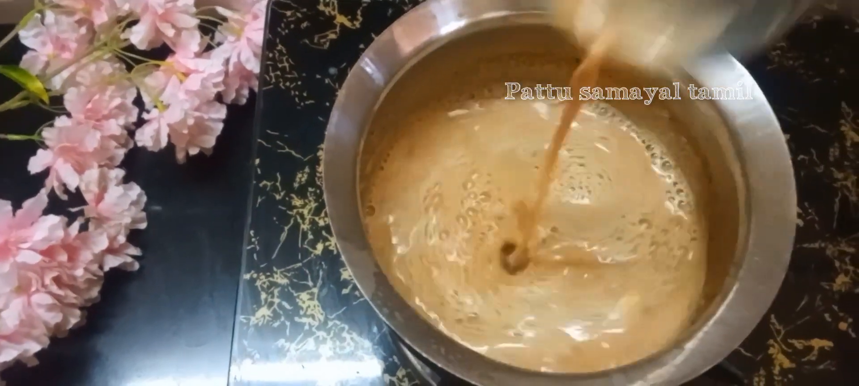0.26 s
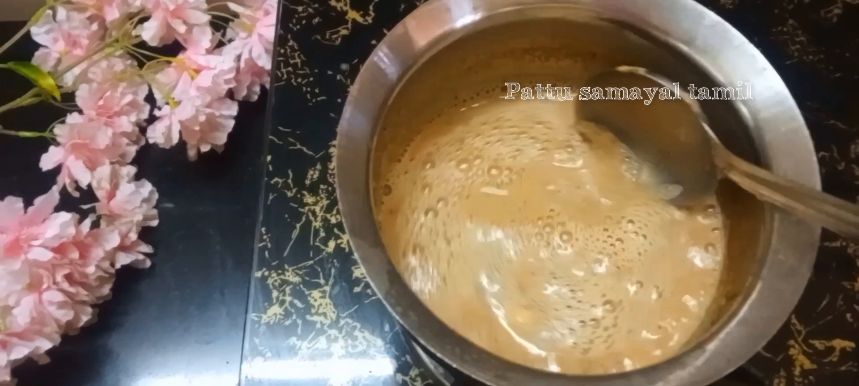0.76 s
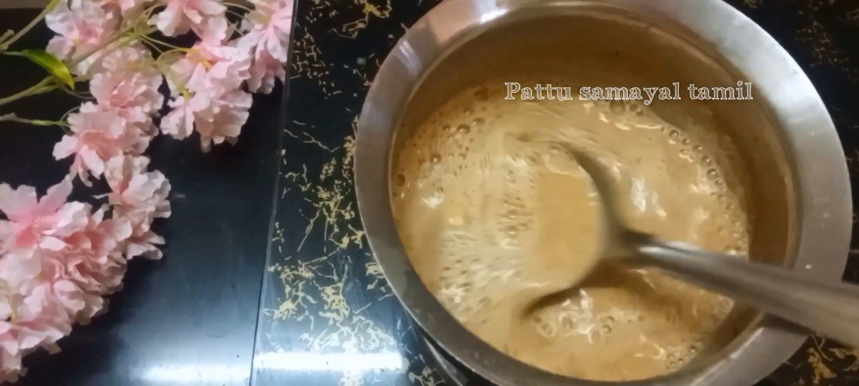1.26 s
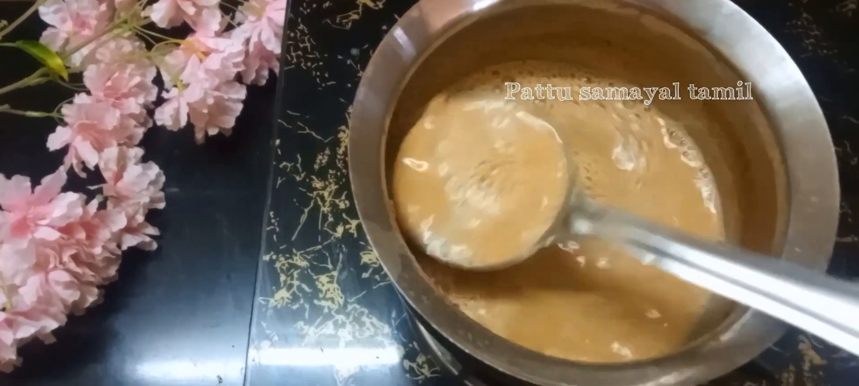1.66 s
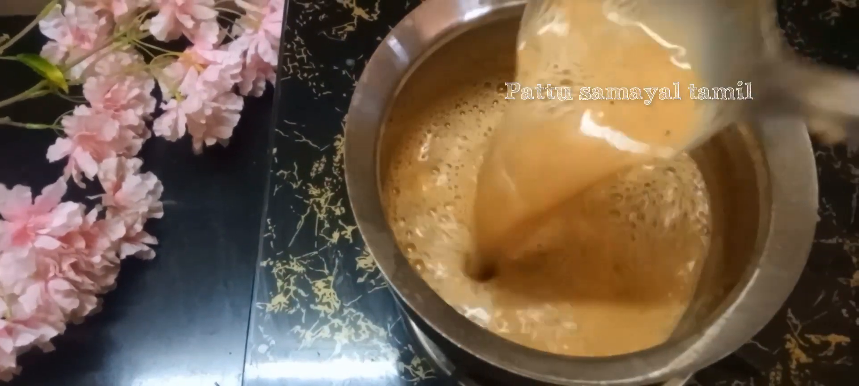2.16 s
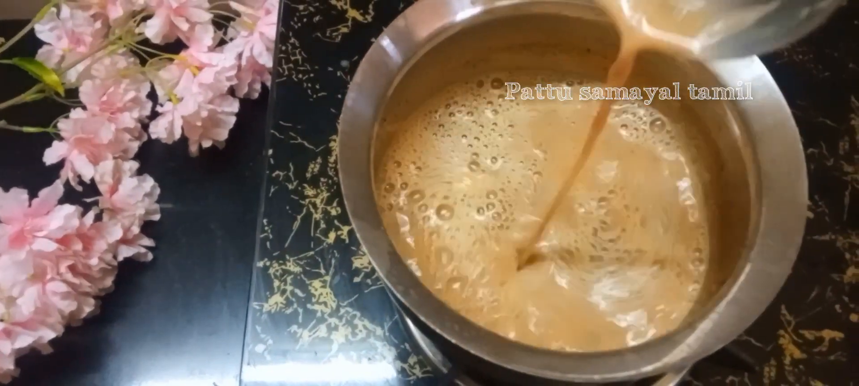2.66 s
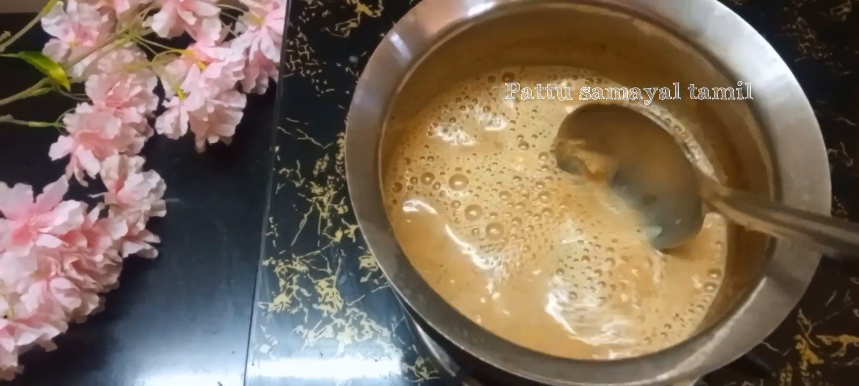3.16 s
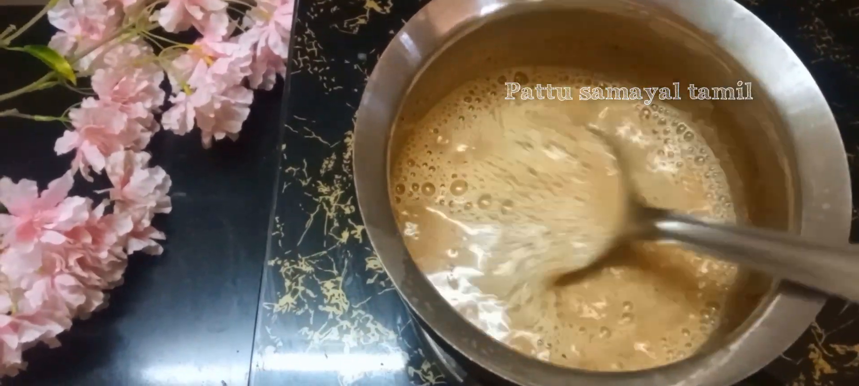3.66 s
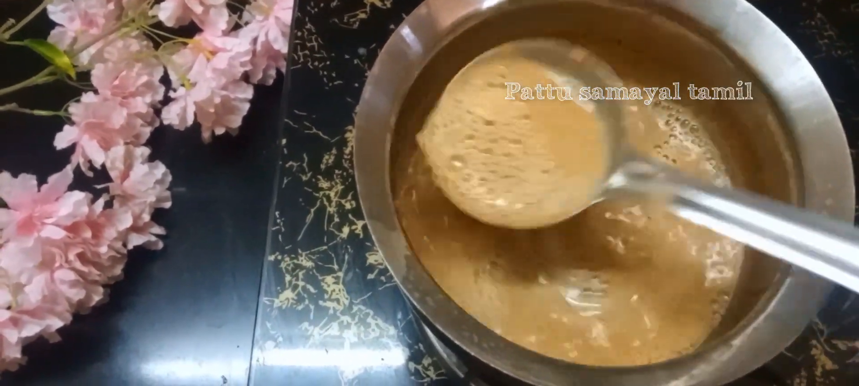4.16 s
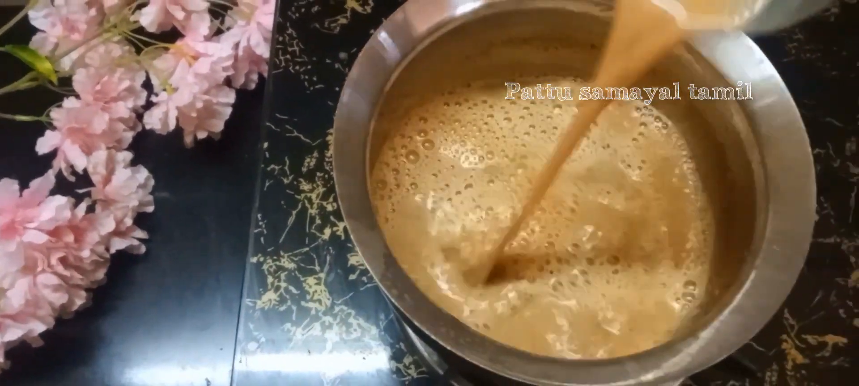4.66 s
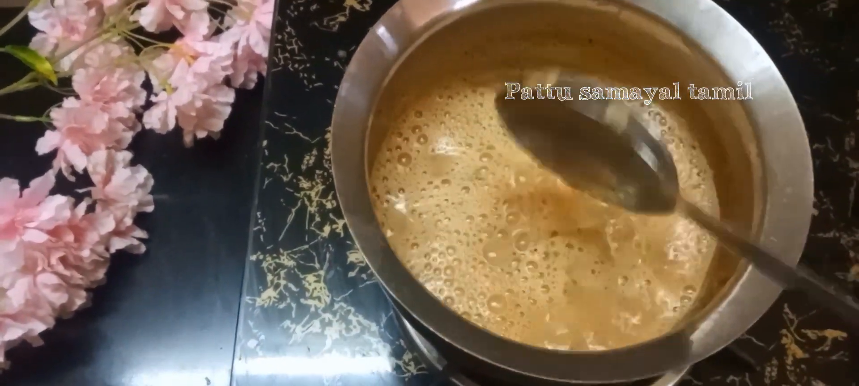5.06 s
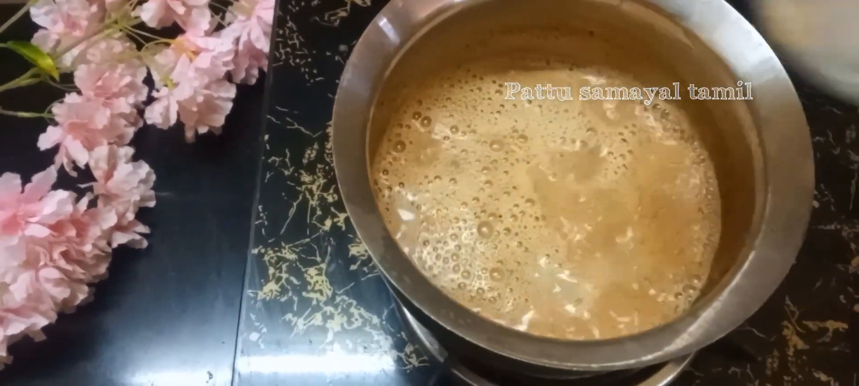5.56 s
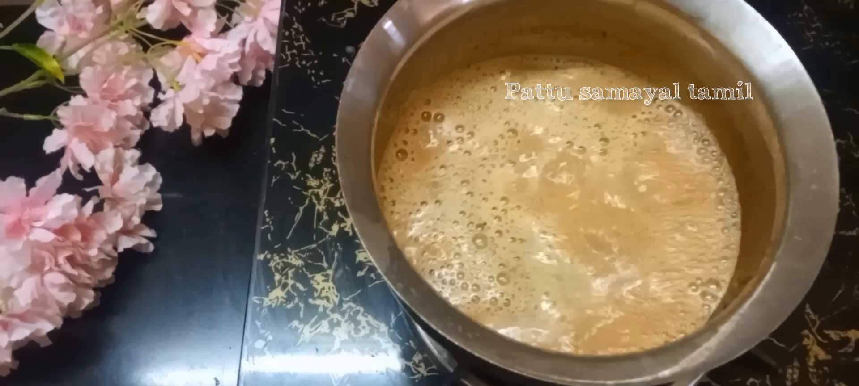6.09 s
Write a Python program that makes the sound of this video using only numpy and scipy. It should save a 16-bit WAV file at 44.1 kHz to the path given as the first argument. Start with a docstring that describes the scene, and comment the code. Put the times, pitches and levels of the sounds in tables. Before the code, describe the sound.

Tea splatters into a metal pot, a ladle clanks brightly and drags along the wall, then more pours, soft knocks and fizzing froth follow.

```python
"""A steel ladle scoops milky tea from a metal pot and pours it back, in a small kitchen, close to a camera.
Its clinks are noise bursts and steel modes, its scrapes are random slips; each blow makes the pot boom on its stand.
The stream splatters as noisy drops and many short rising bubble notes, and leaves a foam of hissing ticks.
Something hard knocks dully nearby: well damped modes under a crunching contact. Air and a hum lie behind.
The camera's two microphone ports resonate at different pitches; the room adds a short diffuse tail."""
import sys
import numpy as np
from scipy import signal
from scipy.fft import rfft, irfft, next_fast_len
from scipy.io import wavfile
from scipy.ndimage import uniform_filter1d, map_coordinates

SR = 44100
rng = np.random.default_rng(int(sys.argv[2]) if len(sys.argv) > 2 else 0)


def store_pcm(level_fs):
    """Save levels as 16-bit WAV."""
    pcm = np.round(np.clip(level_fs, -1, 1) * 32767).astype(np.int16)
    wavfile.write(sys.argv[1], SR, np.atleast_2d(pcm).T)


N = 279153
TIME = np.arange(N) / SR  # s


def amp(db):
    """Decibels to gain."""
    return 10 ** (np.asarray(db) / 20)


def unit(x):
    """Scale to rms 1."""
    return x / np.sqrt(np.mean(x ** 2) + 1e-20)


def peaked(x):
    """Scale to peak 1."""
    return x / (np.abs(x).max() + 1e-20)


def along(points, hz):
    """Read (frequency [Hz], value) points on a log frequency axis."""
    f, v = np.transpose(points)
    return np.interp(np.log(hz + 1), np.log(f + 1), v)


def gains(rows):
    """One smoothed gain curve for each dB column after the time, silent outside the rows."""
    times, *columns = np.transpose(rows)
    curves = [np.interp(TIME, times, db, left=-120, right=-120) for db in columns]
    return [uniform_filter1d(amp(curve), size=256) for curve in curves]


def add(track, start_s, sound):
    """Mix a sound into the track from a start time."""
    part = track[..., max(round(start_s * SR), 0):][..., :sound.shape[-1]]
    part += sound[..., :part.shape[-1]]


def filtered(x, response):
    """Multiply the spectrum of x by a response of frequency."""
    m = next_fast_len(N + SR // 2)
    return irfft(rfft(x, m) * response(np.fft.rfftfreq(m, 1 / SR)), m)[..., :N]


def convolved(x, answer):
    """Play x through an impulse response, at its own length."""
    m = next_fast_len(x.shape[-1] + answer.shape[-1])
    return irfft(rfft(x, m) * rfft(answer, m), m)[..., :x.shape[-1]]


def coloured(x, spectrum, size=2048):
    """Minimum-phase filter with the given (frequency [Hz], level [dB]) shape."""
    cepstrum = irfft(np.log(amp(along(spectrum, np.fft.rfftfreq(size, 1 / SR)))))
    # folding the cepstrum makes the filter causal
    cepstrum[1:size // 2] *= 2
    cepstrum[size // 2 + 1:] = 0
    return convolved(x, irfft(np.exp(rfft(cepstrum))))


def fade(t, t60):
    """Exponential decay by 60 dB in t60 seconds."""
    return np.exp(-np.log(1000) * t / t60)


def burst(t60, spectrum, channels=1):
    """A dying puff of coloured noise, peak 1."""
    t = TIME[:SR // 8]
    noise = rng.standard_normal((channels, len(t)))
    return peaked(coloured(noise * fade(t, t60), spectrum))


def ring(modes, weight, scatter_db):
    """Sum of decaying modes, with strengths and signs drawn anew at each call."""
    t = TIME[:SR]
    out = np.zeros(len(t))
    for hz, db, t60 in modes:
        strength = weight(hz) * amp(db + scatter_db * rng.normal()) * rng.choice([-1, 1])
        out += strength * fade(t, t60) * np.sin(2 * np.pi * hz * t)
    return out


def favour(centre_hz, slope_db):
    """Mode weights that fall with the squared distance in octaves from a centre."""
    return lambda hz: amp(-slope_db * np.log2(hz / centre_hz) ** 2)


def ticks(rate, spread_db):
    """Random impulses of uneven size, on average rate a second."""
    sizes = amp(spread_db * np.minimum(rng.exponential(size=N), 3))
    return (rng.random(N) < rate / SR) * rng.choice([-1, 1], N) * sizes


def wobble(rate):
    """A smooth random curve with rate knots a second."""
    return map_coordinates(rng.standard_normal(int(N * rate / SR) + 4), [TIME * rate])


def patchy(x, depth_db):
    """Let narrow bands come and go at random, then scale to rms 1."""
    z = signal.stft(x, nperseg=512)[2]
    field = rng.standard_normal(z.shape[1:])
    field = uniform_filter1d(uniform_filter1d(field, size=4, axis=0), size=8, axis=1)
    return unit(signal.istft(z * amp(depth_db * unit(field)), nperseg=512)[1][:, :N])


# colour of the background air: (frequency [Hz], level [dB])
AIR_COLOUR = [(25, -30), (60, -4.5), (100, -0.5), (150, -8), (400, -12), (900, -13), (1400, -24),
              (2500, -27.5), (6000, -27), (14000, -40)]
# a low hum swells and sinks: (time [s], level [dB])
HUM_LEVELS = [(0, -70), (1.4, -77), (1.6, -52), (1.8, -79), (2.1, -72.5), (5.6, -79), (6.15, -60),
              (6.33, -75)]


def air():
    """Low kitchen background, part shared and part separate at the two ports, with a wavering hum."""
    shared, left, right = [unit(coloured(rng.standard_normal(N), AIR_COLOUR)) for _ in range(3)]
    tone = np.sin(2 * np.pi * 100 * TIME + 0.23 * wobble(rate=12))
    hum = unit(tone * amp(3.0 * wobble(rate=20)))
    return amp(-67.5) * shared + amp(-68.5) * np.array([left, right]) + gains(HUM_LEVELS)[0] * hum


# how long the small room rings: (frequency [Hz], t60 [s])
ROOM_DECAY = [(150, 0.24), (600, 0.19), (2000, 0.22), (6000, .15), (15000, 0.047)]
# colour of the room tail: (frequency [Hz], level [dB])
ROOM_COLOUR = [(100, -24), (350, 5), (600, 1.5), (1000, -2), (3000, 0), (8000, -9), (15000, 9.5)]


def kitchen(x):
    """A short diffuse tail of decaying noise, different at each port."""
    hz, t, z = signal.stft(rng.standard_normal((2, SR // 2)), SR, nperseg=256)
    tail = signal.istft(z * fade(t, along(ROOM_DECAY, hz)[:, None]), SR, nperseg=256)[1]
    tail = tail * (1 - fade(TIME[:tail.shape[1]], 0.017))  # builds up from nothing
    echo = convolved(x, tail / np.linalg.norm(tail[0]))
    return filtered(echo, lambda f: amp(along(ROOM_COLOUR, f)))


# the froth: (time [s], hiss level [dB])
FOAM_LEVELS = [(0, -59.5), (.6, -55), (.8, -61.5), (1.5, -54.5), (1.85, -55.5), (2.02, -62), (2.3, -59.5),
               (3.1, -57), (3.27, -60.5), (3.6, -55.5), (6.33, -54.5)]
# colour of its hiss: (frequency [Hz], level [dB])
FOAM_COLOUR = [(2000, -21), (3000, -23), (4000, -18), (5000, -12), (5350, -2.5), (6000, -1.5), (6900, 0.5),
               (7500, -9.5), (8000, -26), (9800, -13), (11500, -30), (13800, -37), (15300, -15.5)]


def foam():
    """Countless tiny cells burst in the froth, each a tick that together make a hiss."""
    cells = ticks(rate=8300, spread_db=5) * rng.standard_normal((2, N))
    return gains(FOAM_LEVELS)[0] * unit(coloured(cells, FOAM_COLOUR)) * amp([[.3], [-4]])  # left, right dB


# dull knocks nearby: (time [s], blow level [dB], body level relative to it [dB])
KNOCK_BLOWS = [(3.046, -22, -9), (3.465, -23.5, -5.5), (3.7979, -29, -4), (3.8115, -33, 5),
               (4.2573, -36.5, -8), (4.2766, -28.5, -2), (4.317, -31.5, 2), (4.722, -24.5, -9),
               (5.3466, -34.5, -17), (5.3943, -38, 4), (5.7487, -27, -11.5), (6.2204, -30, -16)]
# modes of the hard thing, before tuning and extra damping: (frequency [Hz], level [dB], t60 [s])
BOARD_MODES = [(610, 1, 0.05), (797, -2, 0.023), (1294, -4, 0.036), (1875, -5, 0.016), (2366, -6.5, 0.023),
               (2680, -2, 0.012), (3120, -14, 0.028), (3500, -25, 0.052), (4220, -13, 0.041)]
BOARD_TUNE, BOARD_LONGEST_S = 0.99, .035  # pitch ratio of the modes; cap on their t60
CRUNCH_T60_S, RATTLE_T60_S = .007, 0.038
GRAZE_S, GRAZE_DB = 0.0035, -16  # how far the graze leads the table time; its level relative to the blow


def knocks():
    """Short dull blows on something hard and well damped; each grazes, crunches and leaves a faint rattle."""
    out, t = np.zeros(N), TIME[:SR // 8]
    for s, db, body_db in KNOCK_BLOWS:
        damped = [(hz * BOARD_TUNE, level, min(t60, BOARD_LONGEST_S)) for hz, level, t60 in BOARD_MODES]
        modes = ring(damped, lambda hz: amp(body_db + 3.0) if hz < 1000 else 1, scatter_db=0.5)
        roughness = 0.64 * fade(t, CRUNCH_T60_S) + amp(-38.5) * fade(t, RATTLE_T60_S)
        contact = rng.standard_normal(len(t)) * roughness
        contact[0] = 1
        thud_colour = [(200, -45), (550, body_db + 18.5), (1000, 5), (2500, -3.5), (4200, 1.5), (6000, -24.5)]
        thud = burst(0.062, thud_colour)[0]
        blow = amp(db) * (peaked(convolved(contact, modes)) + amp(-9.5) * thud)
        add(out, s + .0005, blow)
        add(out, s - GRAZE_S, amp(db + GRAZE_DB) * thud)
    return coloured(out, [(100, -18), (450, 0)])


# single large bubbles: (time [s], peak level [dB], starting pitch [Hz])
GLUG_NOTES = [(.338, -43, 399), (.39, -40, 374), (.78, -57.5, 706), (1.028, -31.5, 377.3),
              (1.715, -58.5, 906), (2.475, -54, 789), (2.82, -49.5, 732), (4.9, -54.5, 767),
              (5.871, -56, 240)]
GLUG_T60_S, GLUG_ATTACK_S, GLUG_RISE = 0.12, 0.029, 0.013  # decay; swell; phase stretch over one t60


def glugs():
    """A large pocket of air swells into a short note that rises slightly."""
    out, t = np.zeros(N), TIME[:SR // 4]
    for s, db, hz in GLUG_NOTES:
        note = np.sin(2 * np.pi * hz * t * (1 + GLUG_RISE * t / GLUG_T60_S))
        swell = (1 - fade(t, GLUG_ATTACK_S)) * fade(t, GLUG_T60_S)
        add(out, s, amp(db) * peaked(swell * note))
    return out


# colour of splashing drops and fine spray: (frequency [Hz], level [dB])
SPRAY_COLOUR = [(880, -66), (1500, -24), (1640, -23.5), (1900, -11.5), (2160, -20.5), (3030, -14.5),
                (3310, -9.5), (6430, 6), (8080, -9.5), (8920, -8.5), (10100, -12), (12500, -24.5),
                (13900, -20), (14900, -18), (16000, -7)]
SLAP_T60_S = 0.018


def slap(sizzle_db, scatter_db=4):
    """A drop slaps the surface: a noise burst with a colour of its own, its sizzle set at 8-14 kHz."""
    colour = []
    for hz, level in SPRAY_COLOUR:
        lift_db = (sizzle_db + 16.5) * (8000 < hz < 14000)
        colour.append((hz, level + scatter_db * rng.normal() + lift_db))
    return burst(SLAP_T60_S, colour, channels=2)


# droplets tried a second; span of their levels; peak of the largest relative to the spray curve
DROPLETS_PER_S, DROPLET_SPREAD_DB, DROPLETS_DB = 40, 14.5, 19.5


def droplets(spray):
    """Small drops stray from the stream at random, in proportion to its spray."""
    out = np.zeros((2, N))
    for when, size in rng.random((int(DROPLETS_PER_S * N / SR), 2)):
        strength = spray[int(when * N)]
        if strength > amp(-90):
            level = strength * amp(DROPLETS_DB - DROPLET_SPREAD_DB * size)
            add(out, when * N / SR, level * slap(sizzle_db=-13))
    return out


# the largest drops hit the surface; the last row is a small cluster of foam cells bursting at once: # (time
# [s], slap level before a 1 dB cut [dB], plop level [dB], sizzle relative to the slap [dB])
LARGE_DROPS = [(.0034, -21.5, -28, -10), (0.0445, -27, -32.5, -36), (0.1586, -16, -52, -2.5),
               (0.175, -34, -30, -20), (.19, -23.5, -33, -11), (0.205, -21.5, -40, -10),
               (0.2208, -21, -34.5, -10), (0.2425, -13.5, -34, -16.5), (0.2938, -13, -23, -18),
               (0.3821, -26.5, -38, -17), (2.0683, -22.5, -42, -23), (2.1862, -23.5, -60, -32),
               (2.2044, -27, -38, -41), (2.2357, -28.5, -65, -40), (2.3123, -32, -65, -7),
               (2.3834, -16, -71, -42), (2.4156, -24, -50, -42), (2.6415, -19, -46.5, -16.5),
               (2.7044, -24, -34.5, -12.5), (2.7357, -25, -39, -35), (2.8087, -23, -60, -27),
               (2.8253, -29.5, -33.5, -21), (2.8565, -24, -40, -14), (2.9017, -27, -50, -36),
               (3.1486, -29, -74, -14), (4.334, -25.5, -49, -22), (4.5895, -37, -40, -12),
               (4.6568, -24.5, -42.5, -12), (4.8504, -32, -42.5, -22), (4.8866, -29.5, -37.5, -16),
               (4.9578, -28, -41, -19), (5.0037, -25.5, -56.5, -0.5), (5.1377, -37, -74, -42)]
# colour of a hollow plop: (frequency [Hz], level [dB])
PLOP_COLOUR = [(200, -23.5), (400, -20), (750, 1.5), (1000, 2.5), (1300, -6.5), (1600, -19), (1950, -18),
               (2800, -17), (5000, -38)]
PLOP_T60_S = 0.016


def drops():
    """Large drops slap, and the hollow that they make plops, both as noise bursts."""
    out = np.zeros((2, N))
    for s, slap_db, plop_db, sizzle_db in LARGE_DROPS:
        add(out, s + .0005, amp(slap_db - 1) * slap(sizzle_db))
        add(out, s, amp(plop_db) * burst(PLOP_T60_S, PLOP_COLOUR))
    return out


def bubbles(rate, hz, octaves, cycles, rise, spread_db, apart):
    """Trapped air rings for a few cycles, rising in pitch; apart = phase range between the ports [cycles]."""
    out = np.zeros((2, N))
    for when, pitch, size, place in rng.random((int(rate * N / SR), 4)):
        f = hz * 2 ** (octaves * (pitch - .5))
        life = cycles / f
        t = TIME[:int(life * SR) + 2]
        port_offset = apart * (place - .5) * np.array([[0], [1]])
        phase = 2 * np.pi * (f * t * (1 + rise * t / life) + port_offset)
        add(out, when * N / SR, amp(spread_db * size ** 3) * np.sin(phase) * fade(t, life))
    return out


# the falling stream, three pours, before the layer levels below:
# (time [s], spray level [dB], bubbles level [dB], deep churn level [dB])
POUR_LEVELS = [
    [(0, -44, -39.5, -44), (.12, -49.5, -48.5, -59.5), (.2, -43, -53, -55), (.28, -57, -48, -53),
     (.32, -48, -47, -55.5), (.36, -62, -41.5, -48), (.42, -50, -39, -47.5), (.46, -81, -60, -53),
     (.5, -82, -75, -77)],
    [(2.05, -65, -59, -60), (2.09, -59, -59, -49), (2.16, -66.5, -75, -73), (2.21, -47.5, -50.5, -52),
     (2.34, -61, -62.5, -62), (2.42, -47.5, -69, -88), (2.48, -57.5, -46.5, -74), (2.6, -66, -64, -79),
     (2.7, -51.5, -45, -50), (2.83, -55, -48.5, -57), (2.95, -57.5, -58, -70), (3.0, -64, -78, -72)],
    [(4.38, -66, -88, -87), (4.42, -54, -59, -78), (4.55, -64, -66.5, -84), (4.66, -56, -53, -65.5),
     (4.82, -69, -73, -75), (4.89, -53, -47.5, -57), (4.95, -64, -60, -64), (5.02, -87, -75, -75)],
]
# low modes of pot and stand: (frequency [Hz], level [dB], t60 [s])
POT_MODES = [(91, -4, 0.42), (138.7, -2.5, 0.31), (164, -2.5, 0.2), (219.2, 1, 0.18), (309.3, -3.5, 0.18),
             (385, -2.5, 0.17), (448, -2, 0.18), (490.6, -4.5, 0.14), (611, -3.5, 0.068), (684, -11, 0.16)]
SPRAY_DB, BUBBLES_DB, CHURN_DB = 2.5, -6, -5.5  # how strongly the stream drives each layer
GUSH_DB = 3.5  # the stream breaks up into clumps


def pouring():
    """The stream bursts into fine spray, drives bubbles under and stirs the pot's low modes."""
    spray, bubbling, churn = np.sum([gains(rows) for rows in POUR_LEVELS], axis=0)
    clumps = amp(GUSH_DB * wobble(rate=70))
    fine = bubbles(rate=1300, hz=4800, octaves=3.2, cycles=22, rise=.06, spread_db=19, apart=.9)
    coarse = bubbles(rate=260, hz=760, octaves=1.6, cycles=36, rise=.06, spread_db=16, apart=.2)
    stirred = ring(POT_MODES, favour(423, slope_db=15.5), scatter_db=0.5)
    deep = convolved(rng.standard_normal(N), stirred)
    out = amp(SPRAY_DB) * spray * unit(clumps * coloured(fine, SPRAY_COLOUR))
    out += amp(BUBBLES_DB) * bubbling * unit(coloured(coarse, PLOP_COLOUR))
    out += amp(CHURN_DB) * churn * unit(deep)
    return out + droplets(spray) + drops()


# the second stroke squeals: (time [s], pitch before jitter [Hz], level [dB])
SQUEAL_PATH = [(3.409, 4700, -62), (3.551, 4800, -64), (3.679, 4804, -55.5), (3.78, 5090, -44.5),
               (3.85, 5280, -62)]
SQUEAL_JITTER, SQUEAL_FLUTTER_DB = 0.0071, 5  # share of the pitch; how much the slips catch and let go


def squeal():
    """The slips lock onto a wall mode and sing roughly: a sine with jittered pitch and fluttering level."""
    s, hz, db = np.transpose(SQUEAL_PATH)
    pitch = np.interp(TIME, s, hz) * (1 + SQUEAL_JITTER * wobble(rate=160))
    tone = np.sin(2 * np.pi * np.cumsum(pitch) / SR)
    flutter = amp(SQUEAL_FLUTTER_DB * wobble(rate=80))
    return gains(np.transpose([s, db]))[0] * unit(tone * flutter)


# the bowl drags along the wall, a list for each of two strokes: (time [s], level [dB])
DRAG_LEVELS = [
    [(.91, -50), (1.01, -46.5), (1.03, -32), (1.09, -35.5), (1.15, -44.5), (1.33, -41.5), (1.45, -46.5),
     (1.5, -65)],
    [(3.4, -68), (3.44, -44), (3.52, -57.5), (3.61, -46), (3.78, -44.5), (3.86, -63)],
]
# colour of each stroke: (frequency [Hz], level [dB])
STROKE_COLOURS = [
    [(500, -23.5), (1400, -14), (2800, -19), (4000, -13.5), (5000, -1.5), (5700, -15), (6300, 6.5),
     (6900, 5), (7400, -15), (8300, -17), (10000, -11), (11700, -18), (13600, -25), (15300, -13)],
    [(500, -17.5), (2000, -19.5), (4400, -19), (5000, -19), (5550, -25), (6200, -2), (6600, 3.5), (7150, 2),
     (8400, -25), (9700, -1), (10700, -9.5), (11500, -16), (13500, -24), (15200, -18)],
]
# modes of ladle and pot wall, ringing freely: (frequency [Hz], level [dB], t60 [s])
STEEL_MODES = [(1378, -21, .45), (2110, -24.5, 1.0), (2405, -41, .6), (4170, -26, .45), (4395, -13.5, .55),
               (4877, -17, .45), (5033, -9, .2), (5998, 1, .16), (6265, -19, .5), (6508, -17, .3),
               (7415, -11, .35), (8220, -35, .35), (9857, -38, .2)]


def scrapes():
    """Steel slips on steel in tiny jerks; the moving contact point picks ever different resonances."""
    out = np.zeros((2, N))
    pressed = [(hz, db / 2, .09) for hz, db, _ in STEEL_MODES]  # contact damps every mode alike
    damped = ring(pressed, favour(6200, slope_db=30), scatter_db=1)
    for rows, colour in zip(DRAG_LEVELS, STROKE_COLOURS):
        slips = ticks(rate=4100, spread_db=3.0) * rng.standard_normal((2, N))
        rasp = patchy(coloured(slips, colour), depth_db=4.5) * amp(1.5 * wobble(rate=60))
        out += gains(rows)[0] * (rasp + amp(-5.5) * unit(convolved(slips, damped)))
    return out + squeal()


# ladle meets pot: (time [s], click level [dB], click t60 [s], knock level [dB], ring level [dB],
# pitch that rings most [Hz], time until smothered [s], first bounce [s],
# boom level [dB], boom centre [Hz], boom push length [s])
LADLE_BLOWS = [(0.8471, -12.5, 0.058, -38, -15.5, 4670, 0.27, 0.032, -30.5, 334, 0.068),
               (0.9166, -11.5, 0.016, -26, -24.5, 3800, 0.39, 0.055, -31.5, 324, 0.037),
               (1.0208, -12, 0.052, -32, -25, 4140, 0.65, 0.048, -31, 324, 0.053),
               (1.334, -13, 0.012, -50, -18, 3370, 0.015, .003, -31, 280, 0.089),
               (1.4253, -6.5, 0.017, -19, -29.5, 3720, .26, .02, -28, 398, 0.1),
               (3.2887, -10.5, 0.0056, -24, -60, 5000, .06, 0.013, -34, 260, 0.054),
               (3.8093, -27.5, 0.082, -41, -37.5, 5060, 0.031, 0.0043, -44, 410, .02),
               (4.726, -40, 0.012, -52, -65, 5000, .03, 0.017, -40, 270, 0.026)]
# colour of the dull rattle in the boom: (frequency [Hz], level [dB])
JUDDER_COLOUR = [(50, -26), (110, 3), (500, 0.5), (800, -5), (1600, -26), (5000, -54)]
BOOM_LAG_S, JUDDER_DB = 0.00395, -11.5  # delay after the blow; rattle relative to the boom


def booms():
    """Every blow shoves the pot: it judders on its stand and its low modes answer."""
    out, t = np.zeros(N), TIME[:SR // 4]
    for s, *_, db, hz, length in LADLE_BLOWS:
        judder = rng.standard_normal(len(t)) * np.sin(np.pi * np.minimum(t / length, 1))
        modes = ring(POT_MODES, favour(hz, slope_db=6), scatter_db=2.5)
        boom = peaked(signal.fftconvolve(judder, modes))
        add(out, s + BOOM_LAG_S, amp(db) * boom)
        add(out, s + BOOM_LAG_S, amp(db + JUDDER_DB) * peaked(coloured(judder, JUDDER_COLOUR)))
    return out


# colour of the steel click: (frequency [Hz], level [dB])
CLICK_COLOUR = [(500, -47), (1500, -4), (3000, -16), (4300, -0.5), (5500, 1), (6600, 12.5), (7300, -7),
                (8200, -14), (10000, -8), (13000, -31), (15300, -13.5)]
# each flight over the last; any bounce under its blow; further loss for each bounce
BOUNCE_SHRINK, BOUNCE_SOFT_DB, BOUNCE_LOSS_DB = 0.93, 12, 3
RING_ATTACK_S, KNOCK_T60_S = 0.085, 0.014


def clinks():
    """Each blow: a steel click and a knock of the pot, two ever quicker bounces, a ring the tea smothers."""
    out, t = np.zeros((2, N)), TIME[:SR]
    for s, click_db, t60, knock_db, ring_db, hz, life, flight, *_ in LADLE_BLOWS:
        for k in range(3):
            when = s + flight * (1 - BOUNCE_SHRINK ** k) / (1 - BOUNCE_SHRINK)
            loss_db = BOUNCE_SOFT_DB * (k > 0) + BOUNCE_LOSS_DB * k
            add(out, when, amp(click_db - loss_db) * burst(t60, CLICK_COLOUR, channels=2))
            add(out, when, amp(knock_db - loss_db) * burst(KNOCK_T60_S, PLOP_COLOUR))
        # the bowl rings up as it leaves the wall
        swell = (1 - fade(t, RING_ATTACK_S)) * np.exp(-(t / life) ** 4)
        modes = ring(STEEL_MODES, favour(hz, slope_db=2), scatter_db=.8)
        add(out, s, amp(ring_db) * swell * modes)
    return out


# resonances of the two microphone ports: (frequency [Hz], left over right [dB])
PORT_TILT = [(100, -6.5), (400, 2.5), (900, -3), (2000, 2.5), (2800, 2), (3500, 9), (5000, 11.5),
             (6400, 21), (7400, 12.5), (8300, 1.5), (9700, -21.5), (11200, -5.5), (13000, -3), (15300, 2)]


def ports(x, lag_s=.00008):
    """Each port favours its own resonance; sound reaches the left one later, less so at high pitch."""
    def response(hz):
        tilt = amp(along(PORT_TILT, hz))
        delay = np.exp(-2j * np.pi * hz * lag_s / (1 + (hz / 4000) ** 2))
        return 2 * np.array([tilt * delay, np.ones_like(tilt)]) / (1 + tilt)
    return filtered(x, response)


def scene():
    """Ladle, tea and knocks close to the two ports, with the kitchen around them."""
    steel, tea, taps = clinks() + scrapes(), pouring() + glugs(), knocks()
    # left and right dB place the ladle and the tea
    near = steel * amp([[.5], [-2.5]]) + tea * amp([[-1], [2.5]]) + taps + booms() + foam()
    room = kitchen(amp(-7.0) * steel + amp(-6) * tea + amp(-11.0) * taps)
    return ports(near + room) + air()


def record(dry, low_cut_hz=75, top_hz=16000):
    """The camera drops the deep bass and keeps nothing above its band limit."""
    return filtered(dry, lambda hz: (hz < top_hz) * (1j * hz / (low_cut_hz + 1j * hz)) ** 2)


dry = scene()
out = record(dry)
store_pcm(out)
```